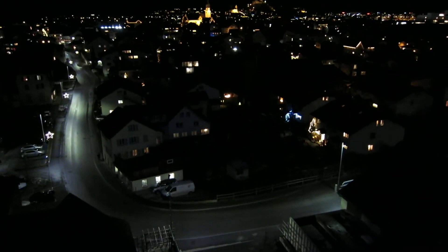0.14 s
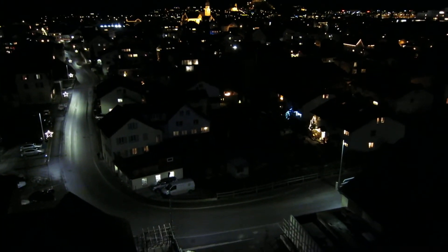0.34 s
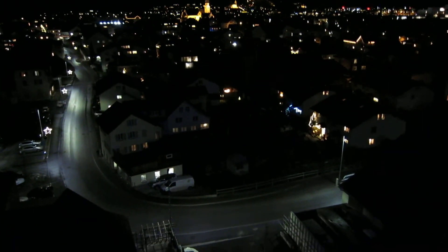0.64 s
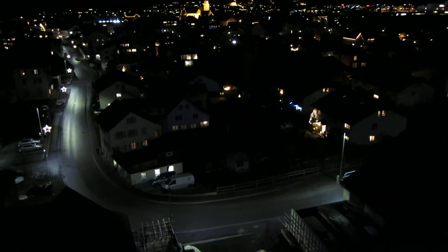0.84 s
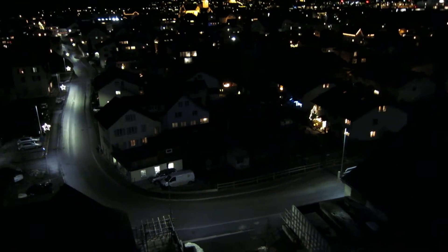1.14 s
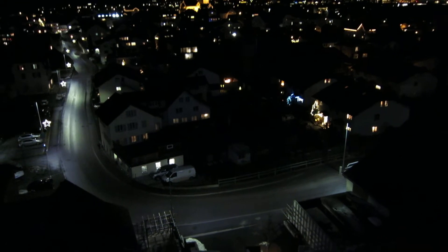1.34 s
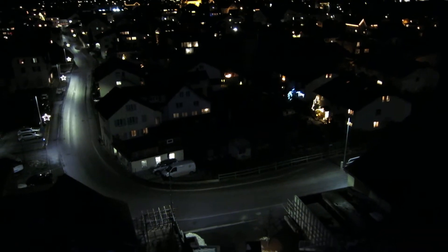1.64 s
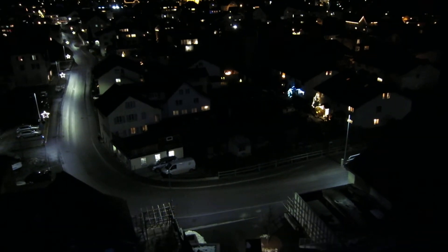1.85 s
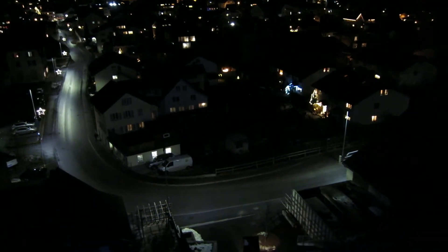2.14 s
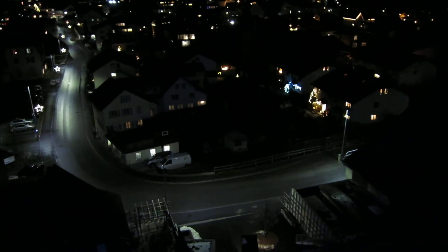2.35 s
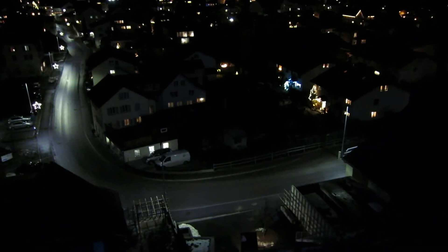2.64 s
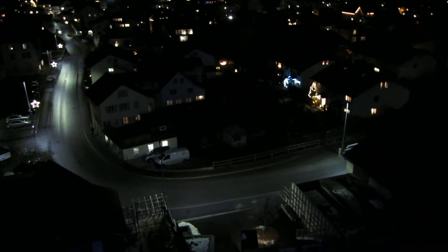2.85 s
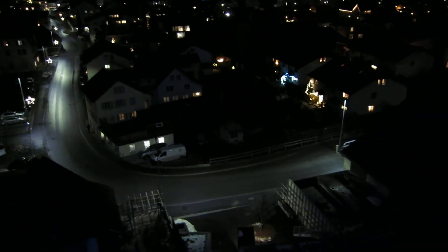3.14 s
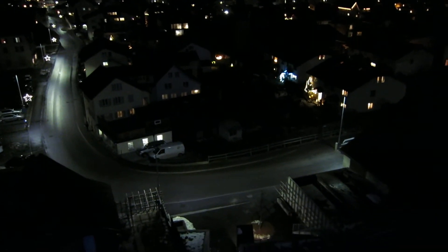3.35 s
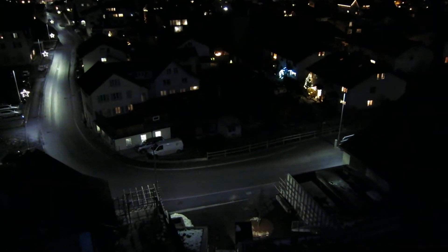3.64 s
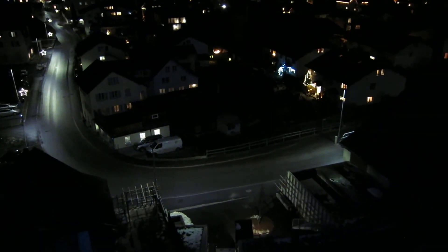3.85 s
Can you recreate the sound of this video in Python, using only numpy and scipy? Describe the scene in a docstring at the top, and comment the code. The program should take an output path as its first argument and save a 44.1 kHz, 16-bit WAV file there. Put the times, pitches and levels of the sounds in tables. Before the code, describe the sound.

A funicular cabin rumbles along its track while wind gusts thump the microphone.

```python
"""A funicular cabin rolls down its track at night: the wheels shake its body, which rumbles, drones
and booms over a thin rolling hiss. The running gear bumps, ticks, swishes and squeaks faintly; a loose
fitting jingles once. Wind buffets and thumps the microphone, its gusts pushing the two sides in opposite
directions; the hardest slaps overload the recorder, whose limiter ducks the ride and slowly lets it back.
"""
import sys
import numpy as np
from scipy import signal
from scipy.fft import rfft, irfft
from scipy.io import wavfile
from scipy.ndimage import uniform_filter1d

SR = 44100
rng = np.random.default_rng(int(sys.argv[2]) if len(sys.argv) > 2 else 0)


def inscribe(sig):
    """Save sig as 16-bit PCM at rate SR to the path in sys.argv[1].

    A 1-D sig is mono; a 2-D sig holds one channel per row.
    Samples are clipped to [-1, 1] before scaling.
    """
    pcm = np.round(np.clip(np.atleast_2d(sig).T, -1, 1) * 32767)
    wavfile.write(sys.argv[1], SR, pcm.astype(np.int16))


N = 176400
TIME = np.arange(N) / SR
FREQS = np.fft.rfftfreq(N, 1 / SR)


def amp(db):
    """Decibels to gain."""
    return 10 ** (np.asarray(db) / 20)


def unit(x):
    """Scale to rms 1."""
    return x / np.sqrt(np.mean(x ** 2) + 1e-20)


def over_freqs(table):
    """Table interpolated over log frequency."""
    hz, value = np.transpose(table)
    return np.interp(np.log(FREQS + 1), np.log(hz + 1), value)


def envelope(table, column=1):
    """One dB column interpolated over time, as gain."""
    columns = np.transpose(table)
    return amp(np.interp(TIME, columns[0], columns[column]))


def resonance(hz, half_width_hz):
    """Steep-sided peak, 9 dB down at the half width."""
    return 1 / (1 + ((FREQS - hz) / half_width_hz) ** 2) ** 1.5


def noise(gain, likeness):
    """Stereo noise, rms 1; likeness runs from -1 (sides opposite) to 1 (mono)."""
    mid, side = rfft(rng.standard_normal((2, N))) * gain
    mid, side = mid * np.sqrt(1 + likeness), side * np.sqrt(1 - likeness)
    return unit(irfft(np.array([mid + side, mid - side]), N))


def drift(rate_hz):
    """Slow random motion, rms 1."""
    lowpass = np.exp(-(FREQS / rate_hz) ** 2) * (FREQS > 0)
    return unit(irfft(rfft(rng.standard_normal(N)) * lowpass, N))


def wavering_tone(hz, wander, rate_hz):
    """Sine whose pitch drifts by the rms fraction `wander`."""
    cycles = np.cumsum(hz * (1 + wander * drift(rate_hz))) / SR
    return np.sin(2 * np.pi * cycles)


def strike(start_s, rise_s, t60_s):
    """Linear rise, exponential decay."""
    age_s = np.maximum(TIME - start_s, 0)
    return np.minimum(age_s / rise_s, 1) * amp(-60 * age_s / t60_s)


# Wind spectrum (frequency [Hz], level [dB])
WIND_SPECTRUM = [(15, -14), (35, 0.5), (65, 8), (160, 7), (280, -0.5), (400, -15), (550, -12), (800, -40),
                 (1400, -40.5), (3000, -79), (6000, -72)]
# Gusts (time [s], rise [s], fall [s], level [dB])
GUSTS = [(.075, 0.0032, 0.027, -5.5), (.122, 0.019, 0.014, -2.5), (.2, 0.018, .02, -14),
         (.29, 0.064, 0.098, -25), (0.455, 0.006, 0.016, -4), (0.798, 0.024, 0.01, -5.5),
         (0.832, 0.0048, 0.0087, -3), (1.078, 0.0046, 0.035, -21.5), (1.192, 0.013, 0.02, -8.5),
         (1.375, 0.017, 0.016, -9), (1.551, 0.017, 0.014, -11.5), (2.006, 0.027, 0.03, -10.5),
         (2.45, 0.021, 0.036, -19), (2.631, 0.034, 0.065, -26.5), (3.238, 0.003, 0.014, -8.5),
         (3.272, .006, .03, -22), (3.752, 0.032, 0.022, -20), (3.966, 0.029, 0.021, -18.5)]


def wind():
    """Lumpy gusts over a light breeze, nearly opposite on the microphone's two sides."""
    breeze_db = -51 + 17 * np.tanh(drift(rate_hz=33))
    power = amp(breeze_db) ** 2
    for at_s, rise_s, fall_s, db in GUSTS:
        gust = np.exp(-np.maximum((at_s - TIME) / rise_s, (TIME - at_s) / fall_s))
        power += (amp(db) * gust) ** 2
    eddies = noise(amp(over_freqs(WIND_SPECTRUM)), likeness=-0.99) * amp(3.5 * drift(rate_hz=53))
    eddy_power = (eddies ** 2).mean(0)
    smoothed_power = uniform_filter1d(uniform_filter1d(eddy_power, size=900), size=900)
    return eddies * np.sqrt(power / smoothed_power)


# Wind slaps (time [s], peak [dB], half width [s], right-side lag [s])
SLAPS = [(0.0975, 9, 0.0012, 0.000085), (.456, 0.5, 0.0015, 0.00012), (0.7576, 0.5, 0.0017, 0.000031),
         (0.795, -0.5, 0.00212, 0.00047), (0.815, 2, 0.0013, 0.00011), (1.381, 7, 0.00094, 0.000021),
         (1.999, 0.5, 0.0021, 0.00027), (3.2659, -2, 0.0018, 0.00031)]


def slaps():
    """Single eddies hit the microphone: one pressure swing each, inverted on the right."""
    out = np.zeros((2, N))
    for at_s, db, half_width_s, lag_s in SLAPS:
        offset = (TIME - at_s - np.array([[0], [lag_s]])) / half_width_s
        out += amp(db) * (1 - 2 * offset ** 2) * np.exp(-offset ** 2)
    return out * np.array([[1], [-1]])


# Wheel squeaks (start [s], length [s], level [dB])
SQUEAKS = [(.74, .1, -55), (.905, .105, -59.5)]


def squeaks():
    """The wheels squeak faintly in one narrow band."""
    out = np.zeros((2, N))
    for start_s, length_s, db in SQUEAKS:
        arch = np.sin(np.pi * np.clip((TIME - start_s) / length_s, 0, 1))
        out += amp(db) * arch * noise(resonance(hz=1675, half_width_hz=54), likeness=1)
    return out


# Swish spectrum (frequency [Hz], level [dB])
SWISH_SPECTRUM = [(300, -1), (1200, 4), (2500, -3), (4000, -10), (8000, -11.5), (13000, -19), (16000, -31)]
# Swishes (time [s], level [dB])
SWISHES = [(1.89, -53), (2.45, -60), (2.68, -49), (3.165, -56), (3.505, -48.5)]


def swishes(half_width_s=0.03):
    """Short soft rushes of the running gear along the track."""
    swells = sum(amp(db) * np.exp(-((TIME - at_s) / half_width_s) ** 2) for at_s, db in SWISHES)
    return swells * noise(amp(over_freqs(SWISH_SPECTRUM)), likeness=0.91)


# Fitting modes (frequency [Hz], half width [Hz], level [dB], t60 [s])
FITTING_MODES = [(5030, 1300, -48, 0.24), (5630, 350, -51, 0.35), (10600, 490, -60, 0.2)]


def jingle(start_s=0.635, rise_s=0.00037):
    """A loose fitting rings once."""
    return sum(amp(db) * strike(start_s, rise_s, t60_s) * noise(resonance(hz, width), likeness=0.95)
               for hz, width, db, t60_s in FITTING_MODES)


# Woody tick body (frequency [Hz], level [dB])
TICK_BODY = [(200, -25), (900, 16.5), (2500, -13.5), (5000, -6), (12000, -7), (16000, -30)]
# Ticks (start [s], level [dB], centre [Hz], half width [Hz], t60 [s], body gain [dB])
TICKS = [(0.633, -39, 10700, 900, 0.04, -8), (.6403, -28, 14000, 1800, 0.0087, 1),
         (1.586, -47.5, 7150, 3020, 0.026, -3), (2.1997, -18, 11600, 2700, 0.0036, 4)]


def ticks(rise_s=0.0001):
    """Small hard ticks of the gear: a high resonance over a woody body."""
    out = np.zeros((2, N))
    for start_s, db, hz, width, t60_s, body_db in TICKS:
        spectrum = resonance(hz, width) + amp(body_db + over_freqs(TICK_BODY))
        out += amp(db) * strike(start_s, rise_s, t60_s) * noise(spectrum, likeness=0.18)
    return out


# Thud and rattle spectra (frequency [Hz], level [dB])
THUD_SPECTRUM = [(20, -14), (35, 16), (60, -7), (130, -5.5), (290, 11.5), (420, -15), (700, -18),
                 (2000, -69)]
RATTLE_SPECTRUM = [(200, -19), (800, 15), (2400, -5.5), (3300, -15), (6000, -16), (16000, -42)]
# Gear and wind thuds (start [s], rise [s], t60 [s], thud [dB], rattle [dB])
THUDS = [(0.056, 0.015, 0.36, -26, -27.5), (0.784, 0.0027, 0.1, -23, -44), (1.367, 0.0065, 0.11, -28, -48),
         (1.994, 0.018, 0.11, -21, -69), (2.158, 0.012, .14, -21.5, -76),
         (2.1997, 0.00026, 0.046, -33, -35), (2.216, 0.0058, 0.31, -37, -39)]


def thuds():
    """Low thuds and rattles: some from the running gear, others from wind slapping the microphone."""
    thud = noise(amp(over_freqs(THUD_SPECTRUM)), likeness=0.97)
    rattle = noise(amp(over_freqs(RATTLE_SPECTRUM)), likeness=0.87)
    return sum(strike(start_s, rise_s, t60_s) * (amp(thud_db) * thud + amp(rattle_db) * rattle)
               for start_s, rise_s, t60_s, thud_db, rattle_db in THUDS)


# Panel booms (time [s], pitch [Hz], half length [s], level [dB])
BOOMS = [(0.115, 136, 0.033, -17), (0.798, 148, 0.051, -29.5), (2.22, 127, .06, -30),
         (2.354, 185, 0.078, -35.5), (2.428, 131, .05, -29.5), (2.624, 186, 0.092, -36),
         (2.67, 235, 0.069, -36), (2.84, 128, 0.12, -31), (3.123, 298, 0.023, -31.5),
         (3.187, 184, 0.049, -32.5), (3.58, 288, 0.017, -30.5), (3.762, 132, 0.13, -32.5),
         (3.937, 298, 0.022, -29)]


def booms():
    """The track sets one cabin panel after another booming, briefly and unsteadily."""
    out = np.zeros(N)
    for at_s, hz, half_length_s, db in BOOMS:
        swell = np.exp(-((TIME - at_s) / half_length_s) ** 2)
        out += amp(db) * swell * unit(wavering_tone(hz, wander=0.0239, rate_hz=17))
    return out


DRONE_HZ = 90.4
# Drone envelope (time [s], level [dB])
DRONE_LEVELS = [(0, -27.5), (.16, -30.5), (.3, -24), (.72, -35), (1.15, -33), (1.5, -36), (1.76, -38),
                (2.08, -37), (2.19, -26), (2.39, -51), (2.53, -27), (2.7, -29.5), (2.86, -41), (3.04, -27),
                (3.17, -22.5), (3.36, -37.5), (3.63, -27), (3.77, -40.5), (3.88, -32.5), (4, -33)]


def drone(flutter_db=2.5):
    """The cabin's lowest boom, wavering in pitch and strength."""
    tone = wavering_tone(DRONE_HZ, wander=0.028, rate_hz=9.3)
    flutter = amp(flutter_db * drift(rate_hz=26))
    return unit(tone * flutter) * envelope(DRONE_LEVELS)


# Rumble and hiss spectra (frequency [Hz], level [dB])
RUMBLE_SPECTRUM = [(15, -25), (35, 3), (52, -30), (75, -5.5), (110, 0), (210, -9.5), (330, -3.5),
                   (450, -7.5), (700, -14), (1000, -18), (1400, -26.5), (2100, -30.5), (3100, -39),
                   (6000, -85)]
HISS_SPECTRUM = [(1200, -20), (2500, -4), (3300, -2), (4300, 0), (6000, 0), (7500, -2.5), (10000, -4),
                 (12000, -3), (14000, -9.5), (15800, -14)]
# Left-right likeness of the ride (frequency [Hz], likeness [-1 to 1])
RIDE_LIKENESS = [(40, 0.34), (130, 1), (300, 1), (800, 0.66), (2000, 0.4), (3500, 0.9), (5500, 0.99),
                 (9000, 0.72), (12000, 0.17)]
# Cabin modes (frequency [Hz], half width [Hz], level re rumble envelope [dB])
CABIN_MODES = [(100.7, 49, -7), (128, 8.5, -8), (183.3, 32.6, -9.5), (238, 11.3, -14), (291.2, 35.4, -10),
               (360.6, 26, -12), (498.5, 4.8, -21), (589, 42, -18), (793, 38, -22.5), (2002, 22, -34.5)]
# Ride envelopes (time [s], rumble [dB], hiss [dB])
RIDE_LEVELS = [(0, -20, -45), (.09, -32, -58.5), (.13, -22.5, -51.5), (.45, -27.5, -53), (.7, -28, -55),
               (.88, -37, -63.5), (1.2, -33, -60), (1.5, -36, -62), (2.1, -36, -60.5), (2.2, -33, -62.5),
               (2.6, -31.5, -62), (2.98, -35.5, -59.5), (3.17, -28.5, -57.5), (3.38, -34.5, -61),
               (3.6, -33, -60), (4, -33.5, -58)]


def cabin(body_db=-4, flutter_db=1.3):
    """Wheels shake the body: an uneven rumble, its resonances and a smooth rolling hiss."""
    likeness = over_freqs(RIDE_LIKENESS)
    drone_notch = 1 - resonance(DRONE_HZ, half_width_hz=6.1)
    body = noise(amp(over_freqs(RUMBLE_SPECTRUM)) * drone_notch, likeness)
    body *= amp(body_db + flutter_db * drift(rate_hz=12))
    modes = sum(amp(db) * noise(resonance(hz, width), likeness) for hz, width, db in CABIN_MODES)
    hiss = noise(amp(over_freqs(HISS_SPECTRUM)), likeness)
    return (body + modes) * envelope(RIDE_LEVELS, column=1) + hiss * envelope(RIDE_LEVELS, column=2)


def scene():
    """Ride plus wind."""
    body = cabin() + drone() + booms()
    return body + thuds() + ticks() + jingle() + squeaks() + swishes() + wind() + slaps()


def record(dry, threshold_db=-2.5, attack_s=0.0012, recovery_db_per_s=12.5, cutoff_hz=15850):
    """Limiter with fast attack and slow recovery, then clipping and a low-pass."""
    over_db = np.maximum(20 * np.log10(abs(dry).max(0) + 1e-9) - threshold_db, 0)
    recovery_db = TIME * recovery_db_per_s
    held_db = np.maximum.accumulate(over_db + recovery_db) - recovery_db
    pole = np.exp(-1 / (attack_s * SR))
    duck_db = signal.lfilter([1 - pole], [1, -pole], held_db)
    clipped = np.clip(dry / amp(duck_db), -1, 1)
    lowpass = signal.firwin(511, cutoff_hz, window=("kaiser", 9), fs=SR)
    return signal.oaconvolve(clipped, lowpass[None], "same")


dry = scene()
out = record(dry)
inscribe(out)
```